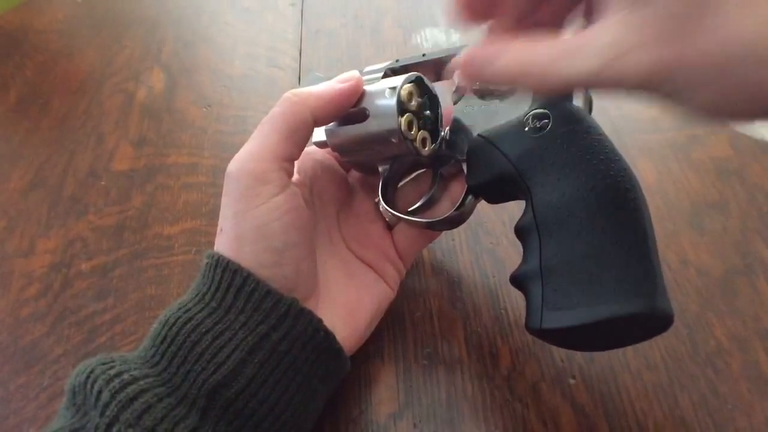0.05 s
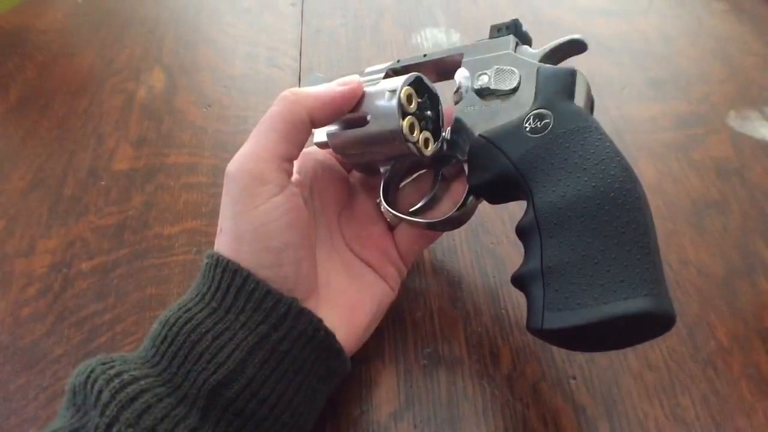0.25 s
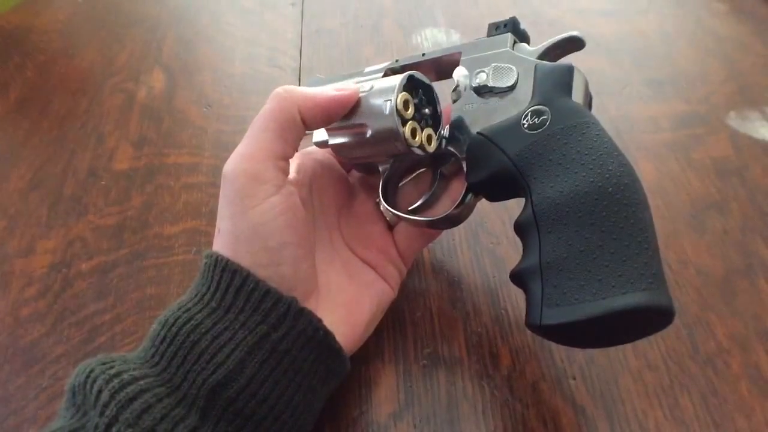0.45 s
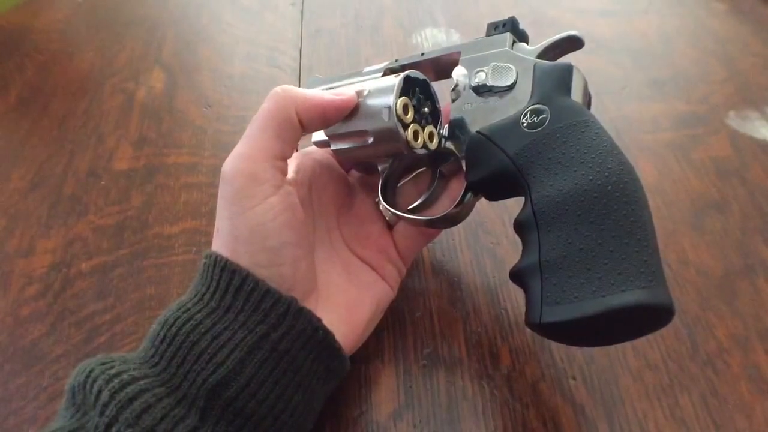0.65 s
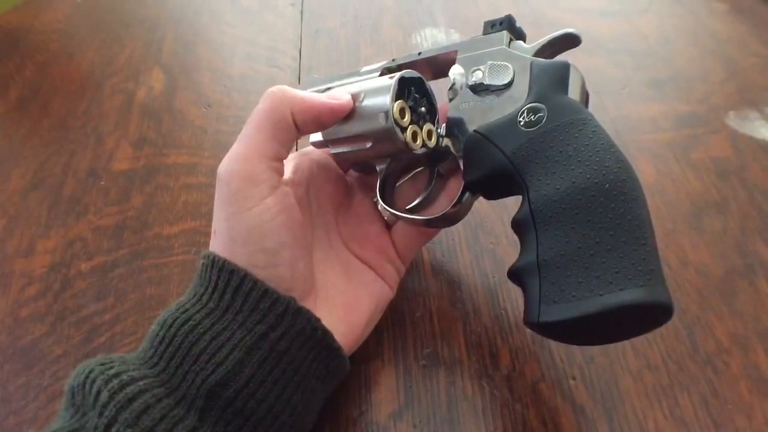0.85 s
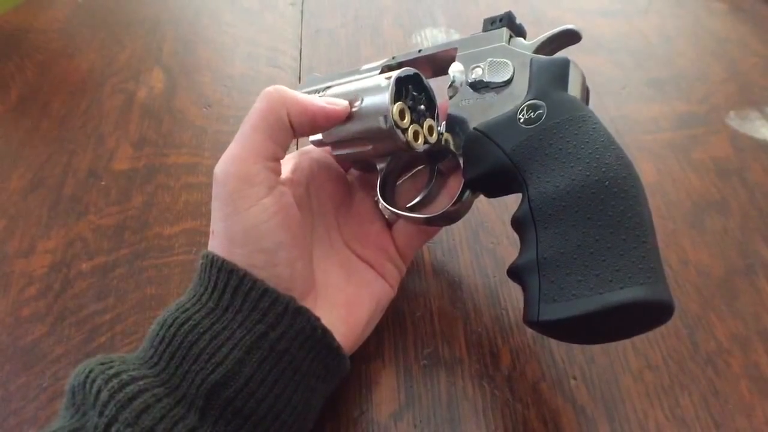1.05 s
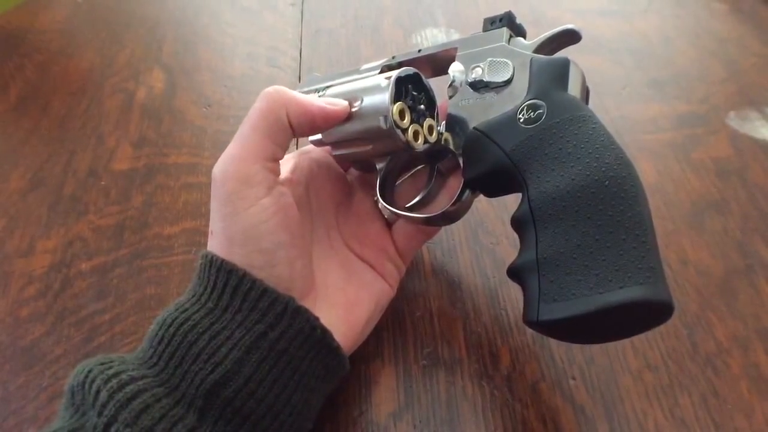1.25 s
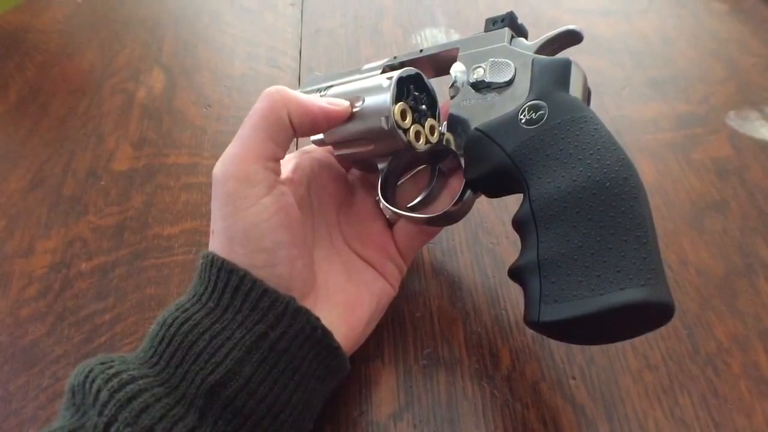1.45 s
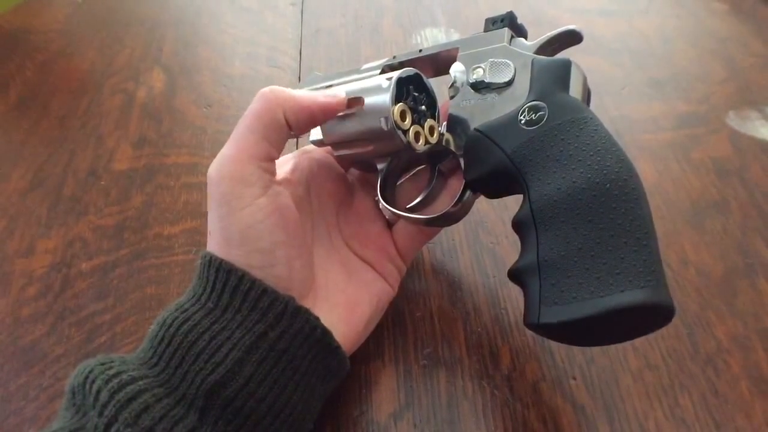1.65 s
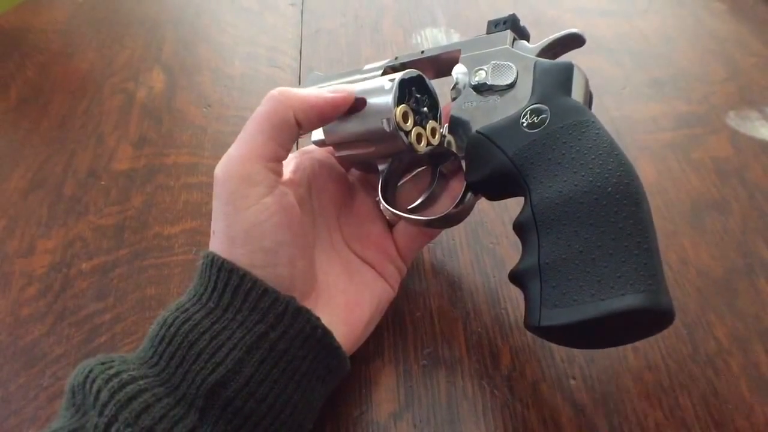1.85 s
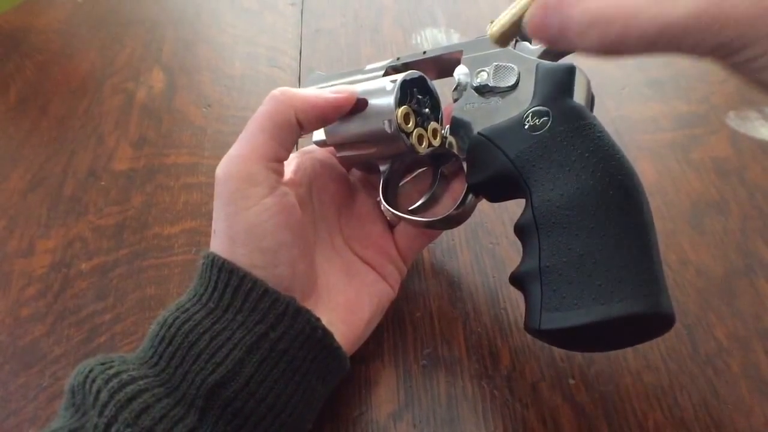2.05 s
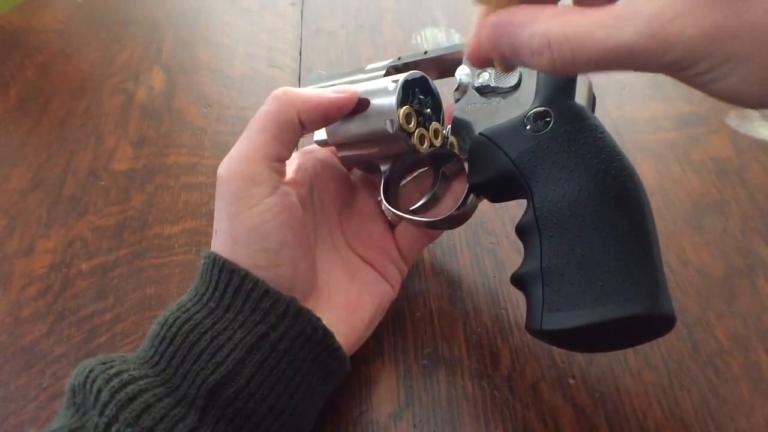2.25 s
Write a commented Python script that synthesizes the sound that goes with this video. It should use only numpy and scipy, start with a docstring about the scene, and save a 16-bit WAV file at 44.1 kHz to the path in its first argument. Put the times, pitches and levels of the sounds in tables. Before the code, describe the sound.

A brass shell scrapes and clicks sharply into a revolver's steel cylinder, then loose shells tick nearby

```python
"""A quiet room hums and hisses around a small microphone throughout: random short-time spectra.
At once a brass shell slides into a revolver's steel cylinder: random slips and knocks ring both.
It seats with a sharp ringing click at 0.14 s; its own ring is choked from about 0.152 s.
From the start a wooden table thuds softly under moving arms: brief swelling low tones.
From 1.13 s a loose shell is picked up nearby: short ticks of fast-dying modes."""
import sys
import numpy as np
from scipy import signal
from scipy.io import wavfile
from scipy.ndimage import uniform_filter1d

SR = 44100
rng = np.random.default_rng(int(sys.argv[2]) if len(sys.argv) > 2 else 0)


def how_loud(loudness_db):
    """Turn decibels into a plain amplitude multiplier (0 dB gives 1, 20 dB gives 10)."""
    steps = np.asarray(loudness_db, float) / 20
    return 10 ** steps


def log_audio(samples):
    """Write samples as a 16-bit WAV file to the path given in sys.argv[1]."""
    # one column per channel
    frames = np.atleast_2d(samples).T
    # limit to full scale, then quantise
    limited = np.clip(frames, -1, 1)
    pcm = np.round(limited * 32767).astype(np.int16)
    wavfile.write(sys.argv[1], SR, pcm)


N = 101429

# Room tone spectrum: f/Hz, relative density/dB per Hz
ROOM_TONE = [(24, -38), (34, -11.5), (53, -1), (81, -12.5), (124, -1), (157, -5.5), (232, -9), (354, -14),
             (393, -14.5), (511, -21.5), (598, -20), (718, -23), (1010, -17.5), (1500, -20), (2000, -25),
             (10400, -38), (13600, -39), (15900, -43)]
ROOM_TONE_RMS_DB = -59.5
LUMP_DB, LUMP_CORNER_HZ = -1.07, 400

# Scrape of shell on chamber wall, breakpoints: t/s, level/dB
SCRAPE = [(0, -53), (.035, -44.5), (0.05, -52), (.08, -56), (.12, -56), (0.143, -40)]
SCRAPE_REGION_HZ, SCRAPE_LEAN_DB_PER_OCT2, SCRAPE_SLIPS_PER_S = 2600, -2.5, 5400
SCRAPE_FLUTTER_DB, SCRAPE_HOLD_S, SCRAPE_SHELL_DB = 5.2, 0.0081, -18.5
SLIP_SPREAD_DB = 0.5

# Scratches, rim catching one part of the wall: start t/s, length/s, level/dB, region f/Hz
SCRATCHES = [(.001, 0.0057, -44, 2700), (.005, 0.012, -43.5, 1720), (.019, 0.03, -45, 3800),
             (0.027, 0.011, -46, 2300), (0.035, 0.0076, -50, 1610), (0.059, 0.0058, -45.5, 4000),
             (0.066, 0.014, -48.5, 4200), (0.083, 0.016, -48.5, 2700), (0.097, 0.029, -47, 3840),
             (0.13, 0.0092, -47.5, 4000)]
SCRATCH_LEAN_DB_PER_OCT2, SCRATCH_SLIPS_PER_S = -45, 2300

# Modes of the hand-held cylinder: f/Hz, level/dB, t60/s
CYLINDER_MODES = [(420, -11.5, 0.033), (678, -9.5, 0.027), (1257, 1, 0.014), (1575, -6, 0.026),
                  (1948, -2.5, 0.01), (2332, -2.5, 0.01), (2797, -2.5, 0.01204), (3380, -10, 0.01322),
                  (4005, 0, 0.011), (5000, -1, 0.012), (5780, 1, 0.0041), (8840, -11, 0.011),
                  (10500, -22, 0.0034), (11300, -7.5, 0.008), (13500, -4.5, 0.0032)]
# Lower ringing group of the brass shell: f/Hz, level/dB, t60/s
SHELL_LOW_MODES = [(12423, -4, 0.082), (12510, 0, 0.0808), (12685, -11, .07)]
# Upper ringing group of the brass shell: f/Hz, level/dB, t60/s
SHELL_HIGH_MODES = [(15300, 2, 0.0382), (15420, -17.5, .08)]

# Knocks of shell in chamber: t/s, cylinder level/dB, strongest region f/Hz,
# lower shell group level/dB, upper shell group level/dB
KNOCKS = [(0.0165, -29, 2500, -68.5, -72), (.0325, -54, 4000, -62.5, -51), (0.0525, -27, 4100, -52, -51.5),
          (0.0567, -55, 4000, -45.5, -63.5), (0.068, -38, 4500, -63, -74), (0.0885, -47, 2860, -62, -64),
          (0.1409, -25.5, 2500, -59.5, -56), (.1422, -18.5, 2400, -53.5, -53.5),
          (0.1433, -18, 5000, -18, -14.5), (.1450, -26.5, 550, -49.5, -46.5),
          (.1475, -31, 2200, -50.5, -50.5), (.1500, -28, 3080, -43.5, -38), (0.1535, -34, 1800, -32, -50.5),
          (0.171, -39, 2290, -49, -47.5)]
CONTACT_RISE_S = 0.000098
KNOCK_LEAN_DB_PER_OCT2, LEAN_FLOOR_DB = -10.5, -13.5
WAVER_DB, WAVER_HOLD_S = 3.5, 0.0033
CHOKE_START_S, CHOKE_S, CHOKE_DB = 0.1518, 0.0033, -8.5

# Thuds through the table top: centre t/s, length/s, level/dB, f/Hz
THUDS = [(0.019, 0.083, -57, 133), (.022, 0.016, -55, 426), (0.194, 0.11, -54.5, 125),
         (0.544, 0.046, -53.5, 125), (0.789, 0.011, -63, 400), (.82, 0.048, -55, 119),
         (.865, 0.016, -54, 180), (1.056, 0.034, -59.5, 252), (1.091, 0.076, -53.5, 125.6),
         (1.136, 0.028, -65.5, 400), (1.15, 0.043, -51, 172.4), (1.165, 0.081, -42.5, 119),
         (1.252, 0.042, -60, 272), (1.295, 0.039, -53.5, 118), (1.44, 0.021, -49, 129),
         (1.959, 0.065, -58.5, 135), (2.088, 0.029, -53.5, 129), (2.15, 0.11, -53, 135),
         (2.181, 0.019, -51.5, 230)]
THUD_OVERTONE_DB = -20.5

# Ticks of the loose shell: t/s, level/dB, strongest region f/Hz
TICKS = [(1.1319, -55, 5200), (1.1322, -46.5, 5400), (1.2414, -27.5, 5000), (1.2459, -40.5, 5000),
         (1.2510, -28.5, 5000), (1.2535, -37, 5000), (1.2549, -40, 4800), (1.2578, -44, 3460),
         (1.2630, -39, 2400), (1.399, -47.5, 5730), (1.402, -43, 5660), (1.6037, -58, 5500)]
# Modes the ticks ring with: f/Hz, level/dB, t60/s
LOOSE_MODES = [(1680, -14, 0.011), (2340, -10, 0.012), (2780, -12, 0.015), (3340, -3, 0.0052),
               (4000, -3.5, 0.0063), (4380, -6, 0.0066), (5050, -0.5, 0.0065), (5614, -3, 0.0039),
               (8870, 5, 0.0018), (10530, -7, 0.0032), (13200, 3.5, .003), (14900, -17, .002)]
TICK_LEAN_DB_PER_OCT2 = -73

# Reverberation of the room: f/Hz, t60/s
REVERB_T60 = [(300, 0.16), (1200, 0.46), (2500, 0.4), (5000, 0.28), (9000, 0.26), (15000, 0.13)]
FIRST_ECHO_S, CYLINDER_REVERB_DB, LOOSE_REVERB_DB = 0.003, -14, -4

SMALL_PARTS_LOW_HZ, RECORDER_EDGE_HZ = 300, 16200


def evened(x):
    """Scales to unit rms."""
    return x / np.sqrt(np.mean(x ** 2) + 1e-20)


def read(points, hz):
    """Interpolates a table's value over log frequency."""
    point_hz, value = np.transpose(points)
    return np.interp(np.log(hz + 1), np.log(point_hz + 1), value)


def add(mix, start_s, sound):
    """Adds a sound into the mix at start_s, cut at the end."""
    part = mix[max(round(start_s * SR), 0):][:len(sound)]
    part += sound[:len(part)]


def room_tone():
    """Random short-time spectra shaped as room noise; the bass is lumpy, the hiss smooth."""
    frames, hz = N // 512 + 5, np.fft.rfftfreq(2048, 1 / SR)
    real, imag, lumps = rng.standard_normal((frames, 1025, 3)).T
    lumps = uniform_filter1d(lumps, size=5, axis=0)
    lumps = evened(uniform_filter1d(lumps, size=3, axis=1))
    lump_db = LUMP_DB * lumps / (1 + (hz[:, None] / LUMP_CORNER_HZ) ** 2)
    spectra = (real + 1j * imag) * how_loud(read(ROOM_TONE, hz)[:, None] + lump_db)
    noise = signal.istft(spectra, nperseg=2048, noverlap=1536)[1][:N]
    return how_loud(ROOM_TONE_RMS_DB) * evened(noise)


def ring(modes, scatter_db, detune, region_hz=None, lean_db_per_oct2=KNOCK_LEAN_DB_PER_OCT2):
    """One blow: modes die exponentially, weaker away from the struck region, scattered at random."""
    t = np.arange(SR // 4) / SR
    scatter = rng.standard_normal((len(modes), 2))
    out = np.zeros(len(t))
    for k, ((hz, db, t60), (level_draw, pitch_draw)) in enumerate(zip(modes, scatter)):
        octaves = np.log2(hz / (region_hz or hz))
        lean_db = max(lean_db_per_oct2 * octaves ** 2, LEAN_FLOOR_DB)
        sign = (-1 if region_hz else 1) ** k  # alternating polarity when a region is struck
        envelope = how_loud(db + lean_db + scatter_db * level_draw - 60 * t / t60)
        out += sign * envelope * np.sin(2 * np.pi * hz * (1 + detune * pitch_draw) * t)
    return out * (1 - np.exp(-t / CONTACT_RISE_S))


def flutter(spread_db, hold_s, n):
    """A gain that wanders at random, holding for about hold_s."""
    size = max(round(hold_s * SR), 1)
    wander = uniform_filter1d(rng.standard_normal(n), size)
    return how_loud(spread_db * evened(uniform_filter1d(wander, size)))


def rubbed(body, level, slips_per_s):
    """Friction: uneven slips of random sign, following level, excite a body."""
    size, chance, sign = rng.random((len(level), 3)).T
    strength = how_loud(SLIP_SPREAD_DB * np.log(1 - size))
    slips = strength * (chance < slips_per_s / SR) * np.sign(sign - .5)
    return signal.fftconvolve(evened(slips) * level, body / np.linalg.norm(body))


def slide():
    """A faint fluttering scrape rings cylinder and shell; scratches where the rim catches."""
    n, out = round(SCRAPE[-1][0] * SR), np.zeros(N)
    level = how_loud(np.interp(np.arange(n) / SR, *np.transpose(SCRAPE)))
    level = level * flutter(SCRAPE_FLUTTER_DB, SCRAPE_HOLD_S, n)
    steel = ring(CYLINDER_MODES, 1.5, 0, SCRAPE_REGION_HZ, SCRAPE_LEAN_DB_PER_OCT2)
    add(out, 0, rubbed(steel, level, SCRAPE_SLIPS_PER_S))
    brass = ring(SHELL_LOW_MODES + SHELL_HIGH_MODES, 0, 0)
    add(out, 0, rubbed(brass, how_loud(SCRAPE_SHELL_DB) * level, SCRAPE_SLIPS_PER_S))
    for start_s, length_s, db, region_hz in SCRATCHES:
        swell = np.sqrt(np.sin(np.linspace(0, np.pi, round(length_s * SR))).clip(0))
        steel = ring(CYLINDER_MODES, 0, 0, region_hz, SCRATCH_LEAN_DB_PER_OCT2)
        add(out, start_s, rubbed(steel, how_loud(db) * swell, SCRATCH_SLIPS_PER_S))
    return out


def knocks():
    """Blows ring cylinder and shell; the shell's ring wavers at random throughout and is choked late."""
    steel, brass = np.zeros((2, N))
    for start_s, cylinder_db, region_hz, low_db, high_db in KNOCKS:
        add(steel, start_s, how_loud(cylinder_db) * ring(CYLINDER_MODES, 1.5, .008, region_hz))
        add(brass, start_s, how_loud(low_db) * ring(SHELL_LOW_MODES, 0, 0))
        add(brass, start_s, how_loud(high_db) * ring(SHELL_HIGH_MODES, 0, 0))
    choked = np.clip((np.arange(N) / SR - CHOKE_START_S) / CHOKE_S, 0, 1)
    return steel + brass * flutter(WAVER_DB, WAVER_HOLD_S, N) * how_loud(CHOKE_DB * choked)


def thin(x):
    """Small parts radiate no bass: high-pass."""
    return signal.sosfilt(signal.butter(4, SMALL_PARTS_LOW_HZ, "high", fs=SR, output="sos"), x)


def reverb(x):
    """Sparse echoes of random sign, each band dying at its own speed."""
    taps = np.zeros(SR // 2)
    slots = np.arange(0, SR // 2 - 20, 20)
    taps[slots + rng.integers(0, 20, len(slots))] = rng.choice([-1., 1.], len(slots))
    taps[:round(FIRST_ECHO_S * SR)] = 0
    hz, t, spectra = signal.stft(taps, SR, nperseg=128)
    decay = how_loud(-60 * t / read(REVERB_T60, hz)[:, None])
    tail = signal.istft(spectra * decay, SR, nperseg=128)[1]
    return signal.fftconvolve(x, tail / np.linalg.norm(tail))[:N]


def thuds():
    """A few cycles of the table's low note and its octave, swelling and fading."""
    t = np.arange(N) / SR
    out = np.zeros(N)
    for centre_s, length_s, db, hz in THUDS:
        since = t - centre_s
        swell = np.exp(-8 * (since / length_s) ** 2)
        octave = how_loud(THUD_OVERTONE_DB) * np.cos(4 * np.pi * hz * since)
        out += how_loud(db) * np.sqrt(2) * swell * (np.sin(2 * np.pi * hz * since) + octave)
    return out


def ticks():
    """Short ticks of brass on brass, ringing on in the room: fast-dying modes."""
    out = np.zeros(N)
    for start_s, db, region_hz in TICKS:
        add(out, start_s, how_loud(db) * ring(LOOSE_MODES, 1.5, .015, region_hz, TICK_LEAN_DB_PER_OCT2))
    return out


def scene():
    """Sums direct sounds, their reverberation, thuds and room tone, in mono."""
    cylinder = thin(knocks() + slide())
    loose = thin(ticks())
    echoes = reverb(how_loud(CYLINDER_REVERB_DB) * cylinder) + reverb(how_loud(LOOSE_REVERB_DB) * loose)
    return (cylinder + loose + echoes + thuds() + room_tone())[None]


def band_limit(x):
    """A steep low-pass at the top of the band."""
    return signal.sosfilt(signal.butter(12, 17080, fs=SR, output="sos"), x)


def record(dry):
    """The recorder limits the band: linear-phase low-pass."""
    lowpass = signal.firwin(255, RECORDER_EDGE_HZ, fs=SR)[None]
    mix = signal.oaconvolve(dry, lowpass, "same")
    return band_limit(mix)


dry = scene()
out = record(dry)
log_audio(out)
```